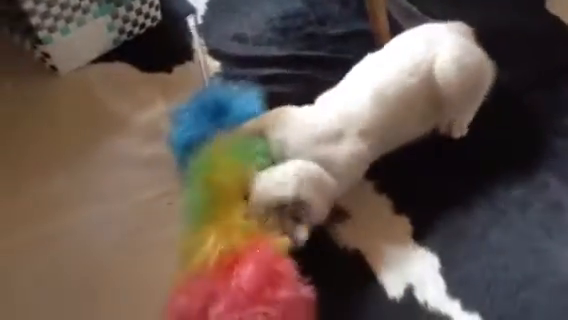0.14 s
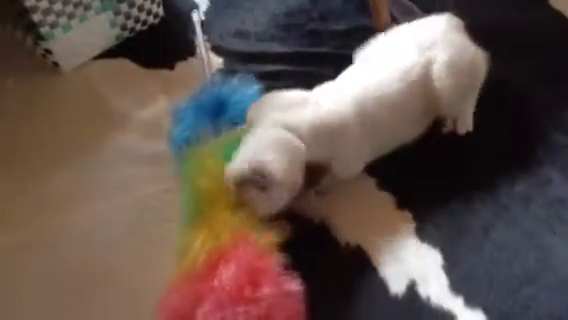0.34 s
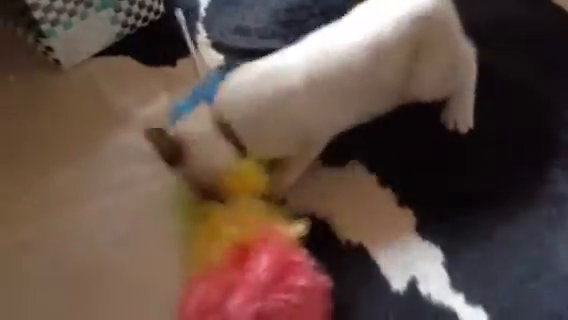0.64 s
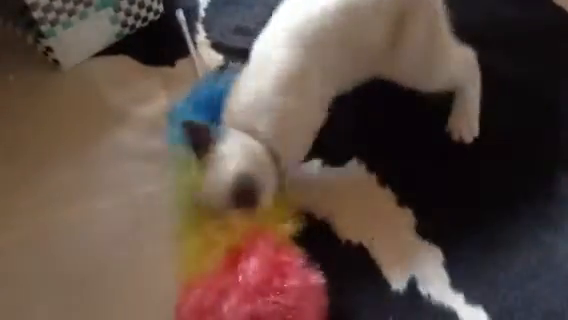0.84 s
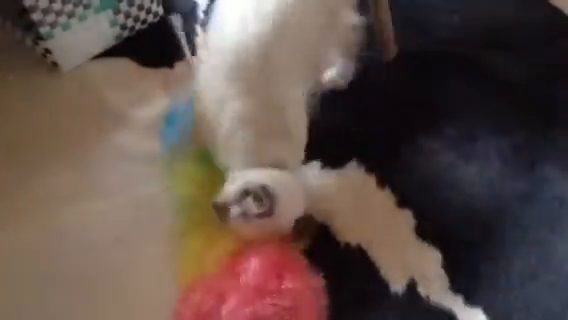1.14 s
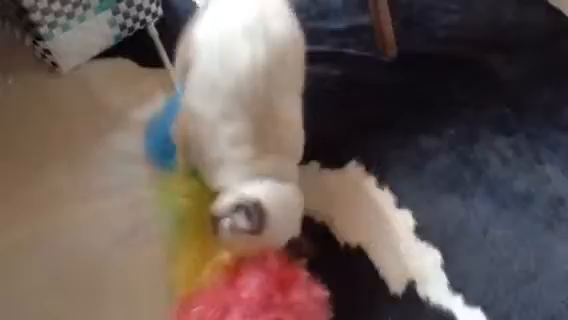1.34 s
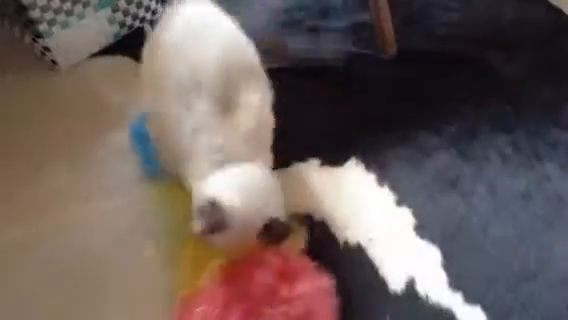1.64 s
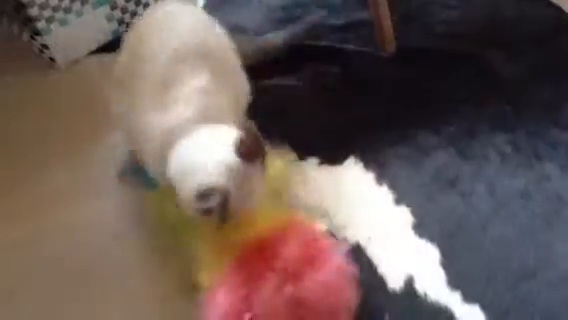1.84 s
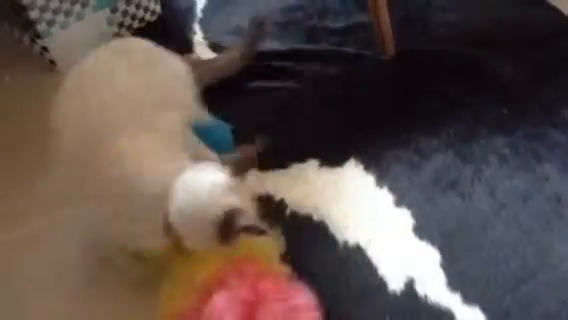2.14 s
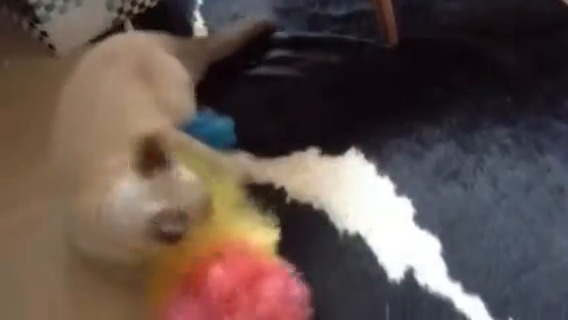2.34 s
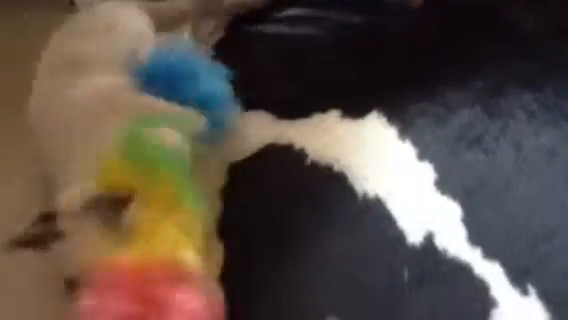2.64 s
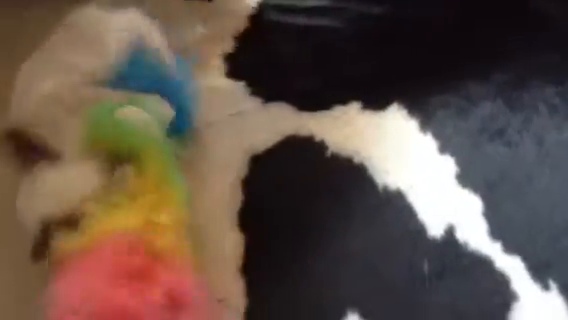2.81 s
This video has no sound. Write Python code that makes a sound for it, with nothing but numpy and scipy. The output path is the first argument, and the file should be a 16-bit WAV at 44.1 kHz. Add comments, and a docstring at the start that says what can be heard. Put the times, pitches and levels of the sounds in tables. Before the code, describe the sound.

Quiet rustling of fibres and fur comes and goes with light scuffs and clicks, then padded paw thuds, a quick high squeak and a final handle knock, in a small dry room with faint hum, through a bass-light microphone.

```python
"""Cat wrestling a fluffy duster

Small room, rug and hard floor, one small microphone that loses the bass; both channels are alike.
Behind the cat lie still air and a faint appliance hum (sines) whose level rises and dips.
Fibres and fur rustle as clumped random slips; paws scuff (resonant noise) and pad (damped thuds).
Fibres and claws snap as ringing cracks, and something gives thin squeaks, as unsteady gliding tones.
Near the end the cat rolls over and the duster's handle knocks on the floor: a dull blow and a ring."""
import sys
import numpy as np
from scipy import signal
from scipy.fft import rfft, irfft
from scipy.io import wavfile

SR = 44100
rng = np.random.default_rng(int(sys.argv[2]) if len(sys.argv) > 2 else 0)


def store_pcm(level_fs):
    """Save levels as 16-bit WAV."""
    pcm = np.round(np.clip(level_fs, -1, 1) * 32767).astype(np.int16)
    wavfile.write(sys.argv[1], SR, np.atleast_2d(pcm).T)


N = 130977
TIME = np.arange(N) / SR


def amp(db):
    """Decibels to gain."""
    return 10 ** (np.asarray(db) / 20)


def unit(x):
    """Scales to rms 1."""
    return x / np.sqrt(np.mean(x ** 2) + 1e-20)


def read(points, hz):
    """Reads a table of values against frequency, on a log-frequency axis."""
    f, value = np.transpose(points)
    return np.interp(np.log(hz + 1), np.log(f), value)


def level(curve):
    """Gain over time from a curve of seconds and dB."""
    return amp(np.interp(TIME, *np.transpose(curve)))


def colour(x, spectrum):
    """Filters x by a spectrum, then scales it to rms 1."""
    hz = np.fft.rfftfreq(len(x), 1 / SR)
    return unit(irfft(rfft(x) * amp(read(spectrum, hz)), len(x)))


def drift(n, rate_hz):
    """Smooth chance: noise under a Gaussian low-pass, rms 1 over the whole scene, cut to n samples."""
    f = np.fft.rfftfreq(N, 1 / SR)
    smooth = rfft(rng.standard_normal(N)) * np.exp(-(f / rate_hz) ** 2)
    return unit(irfft(smooth, N))[:n]


def add(mix, start_s, sound):
    """Mixes a sound in at start_s, cutting it at the end of the mix."""
    part = mix[round(start_s * SR):][:len(sound)]
    part += sound[:len(part)]


# How long the small room rings. Each row: frequency in Hz, time to fall by 60 dB in seconds.
ROOM_DECAY = [(100,0.12),(500,0.15),(2000,0.18),(6000,0.13),(15000,0.17)]
ROOM_BUILD_S = 0.006


def room(x, wet_db):
    """Direct sound plus random reflections that build up, then die away band by band."""
    n = SR // 2
    taps = rng.standard_normal(n) * (rng.random(n) < .15)  # sparse reflections
    taps *= np.clip(np.arange(n) / SR / ROOM_BUILD_S, 0, 1) ** .5
    hz, t, bands = signal.stft(taps, SR, nperseg=128)
    decay = amp(-60 * t / read(ROOM_DECAY, hz)[:, None])
    tail = signal.istft(bands * decay, SR, nperseg=128)[1]
    reflections = signal.fftconvolve(x, tail / np.linalg.norm(tail))[:len(x)]
    return x + amp(wet_db) * reflections


# Spectrum of the still air in the room. Each row: frequency in Hz, relative level in dB per Hz.
AIR_SPECTRUM = [(25,-1),(55,-7),(90,-7.5),(130,-7),(200,0.5),(300,-2),(600,-3.5),(1000,-11.5),(2500,-14.5),(5500,-16),(10000,-15),(15000,-14)]
AIR_DB = -65.5


def air():
    """Still room air: steady noise in a fixed spectrum."""
    return amp(AIR_DB) * colour(rng.standard_normal(N), AIR_SPECTRUM)


# Tones of the appliance hum. Each row: frequency in Hz, rms level in dB before the curve below.
HUM_TONES = [(75,-86.5),(222.4,-74),(369,-86),(596,-86)]
# Rise and dip of the whole hum. Each row: time in seconds, gain in dB.
HUM_GAIN = [(0,3),(.3,3.5),(.48,2.5),(.62,-9.5),(1.15,1),(1.8,-0.5),(2.3,-4)]


def hum():
    """A few low sines of random phase that rise and dip together."""
    out = np.zeros(N)
    for hz, db in HUM_TONES:
        out += amp(db) * np.sqrt(2) * np.sin(2 * np.pi * (hz * TIME + rng.random()))
    return level(HUM_GAIN) * out


GRAINS_PER_S, GRAIN_SPREAD_DB = 13000, 0.5


def rustle(curve, spectrum, clump_db):
    """Friction as thousands of tiny random slips a second, whose level swells and thins in clumps."""
    size = amp(GRAIN_SPREAD_DB * np.minimum(rng.exponential(1, N), 5))
    slips = size * rng.standard_normal(N) * (rng.random(N) < GRAINS_PER_S / SR)
    clumps = amp(clump_db * drift(N, 70))
    return level(curve) * unit(colour(slips, spectrum) * clumps)


# The cat's weight shifting on the floor. Each row: time in seconds, level in dB.
WEIGHT_LEVEL = [(.45,-89),(.6,-75),(1.05,-80.5),(1.3,-72.5),(2.7,-74),(2.97,-79)]
# Spectrum of that low rumble. Each row: frequency in Hz, relative level in dB per Hz.
WEIGHT_SPECTRUM = [(50,-21),(110,-3),(190,1),(300,-7),(800,-37.5)]


def weight_rumble():
    """Low rumble of the cat's weight shifting, as clumped slips in the bass."""
    return rustle(WEIGHT_LEVEL, WEIGHT_SPECTRUM, clump_db=2.0)


# The cat's body sliding on the rug. Each row: time in seconds, level in dB.
SLIDE_LEVEL = [(0,-67.5),(.1,-63.5),(.2,-70),(.3,-68.5),(.41,-63.5),(.49,-66.8),(.62,-65.5),(.69,-63.5),(.74,-69.5),(.8,-61),(.95,-65.5),(1.1,-67.5),(1.19,-65.5),(1.3,-59.5),(1.5,-67),(1.59,-67.5),(1.92,-64),(1.99,-69),(2.06,-62.5),(2.15,-70),(2.3,-66.5),(2.42,-63.5),(2.49,-64),(2.57,-58),(2.66,-60),(2.84,-60),(2.97,-60.5)]
# Spectrum of rubbed fur. Each row: frequency in Hz, relative level in dB per Hz.
FUR_SPECTRUM = [(100,-21),(300,-4.5),(600,-0.5),(950,-4),(1800,0),(3400,1.5),(5000,1),(8000,-6.5),(15000,-13)]


def body_slide():
    """Fur sliding on the rug, as clumped slips in a broad spectrum."""
    return rustle(SLIDE_LEVEL, FUR_SPECTRUM, clump_db=0.8)


# Paws and fur dragging.
# Each row: start in seconds, length in seconds, level in dB, centre in Hz, width in Hz.
SCUFF_EVENTS = [(.765,0.078,-62,555.6,220),(0.829,0.28,-69.5,1544,620),(2.022,0.078,-66.5,780,450),(2.556,0.077,-63,520,210),(2.91,0.06,-65,396,200)]


def scuffs():
    """Dragging paws: a swell of friction noise in one broad resonance."""
    out = np.zeros(N)
    for start, length, db, hz, width in SCUFF_EVENTS:
        t = np.arange(0, length, 1 / SR)
        # two slow noises on a cosine and a sine make a band of noise round the centre
        rub = drift(len(t), width) * np.cos(2 * np.pi * hz * t)
        rub += drift(len(t), width) * np.sin(2 * np.pi * hz * t)
        add(out, start, amp(db) * np.sin(np.pi * t / length) * unit(rub))
    return out


# Soft paw falls. Each row: start in seconds, level in dB, pitch in Hz.
PAW_FALLS = [(1.224,-50,860),(1.2849,-47,412),(1.302,-55,394),(1.4865,-48.5,435),(1.697,-56,360),(1.913,-50,1340),(2.0165,-45,195)]
PAW_RISE_S, PAW_CYCLES, PAW_BRUSH = 0.00053, 1.5, 0.19  # seconds, cycles of decay, gain of the brush


def paws():
    """Each paw gives a heavily damped thud and a brush of fur."""
    out, t = np.zeros(N), np.arange(SR // 16) / SR
    for start, db, hz in PAW_FALLS:
        thud = np.sin(2 * np.pi * hz * t) * np.exp(-(t * hz / PAW_CYCLES) ** 2)
        brush = colour(rng.standard_normal(len(t)), FUR_SPECTRUM) * np.exp(-t / 0.0096)
        add(out, start, amp(db) * np.minimum(t / PAW_RISE_S, 1) * (thud + PAW_BRUSH * brush))
    return out


# Thin squeaks. Each row: start in seconds, length in seconds, level in dB, pitch in Hz,
# glide as a share of the pitch, arch as a share of the pitch.
SQUEAK_STROKES = [(1.740,0.015,-52,5470,0.03,0.0041),(1.753,0.021,-56.5,5650,0.072,.03),(1.786,0.034,-45,5280,-0.098,0.0713),(1.829,0.0236,-57,5500,0.147,0.023),(1.879,.011,-55.5,5450,0.2,0.021)]
SQUEAK_EDGE_S = 0.0031
SQUEAK_WANDER, SQUEAK_FLUTTER = 0.026, 0.13  # random shares of pitch and of loudness


def squeaks():
    """Short, soft-edged strokes of a high, unsteady tone that arches and glides."""
    out = np.zeros(N)
    for start, length, db, hz, glide, arch in SQUEAK_STROKES:
        t = np.arange(0, length, 1 / SR)
        bend = glide * (t / length - .5) + arch * np.sin(np.pi * t / length)
        pitch = hz * (1 + bend + SQUEAK_WANDER * drift(len(t), 580))
        tone = np.sin(2 * np.pi * np.cumsum(pitch) / SR)
        edges = np.clip(np.minimum(t, length - t) / SQUEAK_EDGE_S, 0, 1)
        flutter = 1 + SQUEAK_FLUTTER * drift(len(t), 400)
        add(out, start, amp(db) * edges * flutter * tone)
    return out


# Spectrum of the blow on the floor. Each row: frequency in Hz, relative level in dB per Hz.
BLOW_SPECTRUM = [(30,-22),(90,-7),(170,0.5),(300,1.5),(450,-1),(680,3),(950,-12),(1400,-5),(2200,-12),(3200,-7.5),(4500,-23),(8000,-26),(14000,-17)]
# Nearest surfaces throwing the blow back. Each row: delay in seconds, level in dB below the blow.
BLOW_ECHOES = [(.0098,-15),(.0133,-13),(.0168,-15.5),(.0243,-18)]
# Ring of the handle. Each row: frequency in Hz, level in dB, time to fall by 60 dB in seconds.
HANDLE_MODES = [(218,-52.5,0.079),(308,-55,0.12),(362,-57,0.25),(615,-61,0.18),(1320,-56.5,0.23),(1980,-54.5,0.16),(2055,-50.5,0.15),(3076,-56.5,0.24)]
KNOCK_S, KNOCK_DB = 2.8579, -15  # start, and energy of the direct blow


def knock():
    """One dull blow on the floor, thrown back by the nearest surfaces; the handle rings briefly."""
    out, n = np.zeros(N), 4096
    log_gain = np.log(amp(read(BLOW_SPECTRUM, abs(np.fft.fftfreq(n, 1 / SR)))))
    # minimum phase: the energy comes as early as the spectrum allows
    blow = np.fft.ifft(np.exp(np.conj(signal.hilbert(log_gain)))).real
    blow = -amp(KNOCK_DB) * blow / np.linalg.norm(blow)
    add(out, KNOCK_S, blow)
    out = room(out, wet_db=-6.0)
    for delay, db in BLOW_ECHOES:
        add(out, KNOCK_S + delay, amp(db) * blow)
    t = np.arange(SR // 4) / SR
    for hz, db, t60 in HANDLE_MODES:
        add(out, KNOCK_S, amp(db - 60 * t / t60) * np.sin(2 * np.pi * hz * t))
    return out


# Snaps of fibres and claws. Each row: start in seconds, level in dB, ring in Hz,
# share of broadband crack (held within 0 to 1), room reflections in dB against the direct snap.
SNAP_EVENTS = [(0.385,-46,4700,0.5,-11),(0.6301,-46,6100,0,-10),(0.6577,-37,5300,0.65,-0.5),(2.0408,-45.5,3500,-0.4,0),(2.2005,-53,5670,.8,-1),(2.5046,-42.5,5400,-0.4,-14),(2.7979,-35.5,4700,0.5,0),(2.8095,-42.5,5500,2,-3),(2.87,-43,5200,-1,6.5),(2.925,-52,3550,-1,3)]
# Spectrum of a crack. Each row: frequency in Hz, relative level in dB per Hz.
CRACK_SPECTRUM = [(400,-17),(1200,-2.5),(2400,1),(6500,2.5),(9000,-8),(15000,-11.5)]
SNAP_DECAY_S, CRACK_DECAY_S, SNAP_LOW_HZ = 0.00025, 0.0015, 500


def snaps():
    """Each snap is a few cycles of ring and often a crack; the cat's body screens some from the room."""
    out, t = np.zeros(N), np.arange(SR // 4) / SR
    swell = t / SNAP_DECAY_S * np.exp(1 - t / SNAP_DECAY_S)
    for start, db, hz, share, wet_db in SNAP_EVENTS:
        ring = np.sin(2 * np.pi * hz * t) * swell
        crack = colour(rng.standard_normal(len(t)), CRACK_SPECTRUM) * np.exp(-t / CRACK_DECAY_S)
        add(out, start, amp(db) * room(ring + np.clip(share, 0, 1) * crack, wet_db))
    low_cut = signal.butter(2, SNAP_LOW_HZ, "high", fs=SR, output="sos")
    return signal.sosfilt(low_cut, out)


# Stirring of the fibres. Each row: time in seconds, level in dB before the trim below.
STIR_LEVEL = [(0,-62.5),(.12,-64.5),(.2,-67.5),(.32,-66),(.38,-64),(.44,-71),(.57,-60),(.7,-64),(.8,-64.5),(1.05,-73),(1.13,-63),(1.19,-63),(1.3,-57.5),(1.42,-59),(1.48,-61),(1.55,-61.5),(1.6,-68),(1.69,-65.5),(1.78,-60),(1.9,-59.5),(1.97,-65),(2.07,-61.5),(2.14,-74),(2.22,-63),(2.27,-66),(2.37,-56.5),(2.48,-65),(2.52,-63),(2.56,-58.5),(2.66,-65.5),(2.75,-58.5),(2.82,-55.5),(2.845,-58),(2.88,-56.5),(2.97,-66)]
# Spectrum of the stirred fibres. Each row: frequency in Hz, relative level in dB per Hz.
FIBRE_SPECTRUM = [(300,-22),(1500,-24),(3800,-11.5),(5400,1),(6300,-1.5),(7500,-7),(10500,-23),(15300,-20)]
# The rustle's treble. Each row: time in seconds, level in dB.
TREBLE_LEVEL = [(0,-64),(.12,-65),(.21,-70),(.31,-69),(.38,-63),(.46,-73),(.55,-61),(.66,-60),(.73,-66),(.8,-64.5),(1.02,-83),(1.1,-67),(1.27,-61.7),(1.44,-60),(1.55,-62),(1.67,-72),(1.77,-67),(1.91,-64),(1.98,-68),(2.05,-59.5),(2.14,-72),(2.27,-66),(2.34,-61.5),(2.6,-63.5),(2.68,-68),(2.75,-60.2),(2.83,-59),(2.875,-55.5),(2.92,-69),(2.97,-75)]
# Spectrum of that treble. Each row: frequency in Hz, relative level in dB per Hz.
TREBLE_SPECTRUM = [(2000,-36),(6000,-21),(8000,-4.5),(10500,-6.5),(13500,1),(15300,1.5)]
STIR_TRIM_DB = -2.5


def duster():
    """The duster's fibres slipping over each other, with a separate layer of treble."""
    stir = amp(STIR_TRIM_DB) * rustle(STIR_LEVEL, FIBRE_SPECTRUM, clump_db=0.5)
    return stir + rustle(TREBLE_LEVEL, TREBLE_SPECTRUM, clump_db=1.2)


def scene():
    """All sources, heard from one point, the same in both channels."""
    background = air() + hum()
    cat = weight_rumble() + body_slide() + scuffs() + room(paws(), wet_db=-4.0)
    mono = background + cat + room(squeaks(), wet_db=-11.0) + knock() + snaps() + duster()
    return np.array([mono, mono])


LOW_CUT_HZ, HIGH_CUT_HZ = 133, 15330


def record(dry):
    """A small microphone that loses the bass, then a steep cut of the highest treble."""
    low_cut = signal.butter(2, LOW_CUT_HZ, "high", fs=SR, output="sos")
    thin = signal.sosfilt(low_cut, dry)
    band_limit = signal.firwin(1023, HIGH_CUT_HZ, window=("kaiser", 9), fs=SR)
    return signal.oaconvolve(thin, band_limit[None], "same")


dry = scene()
out = record(dry)
store_pcm(out)
```